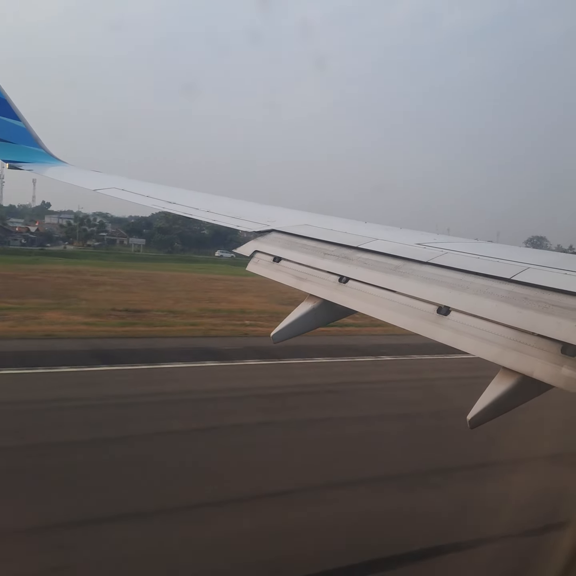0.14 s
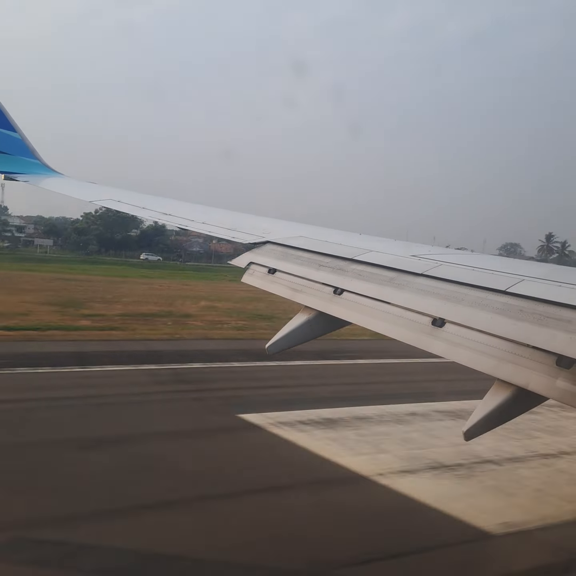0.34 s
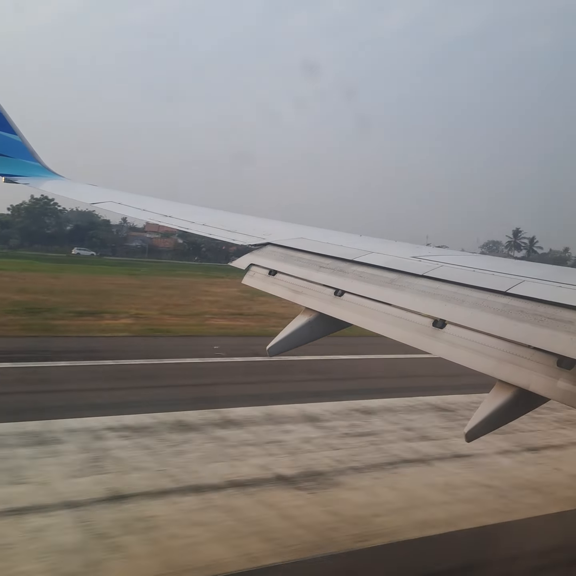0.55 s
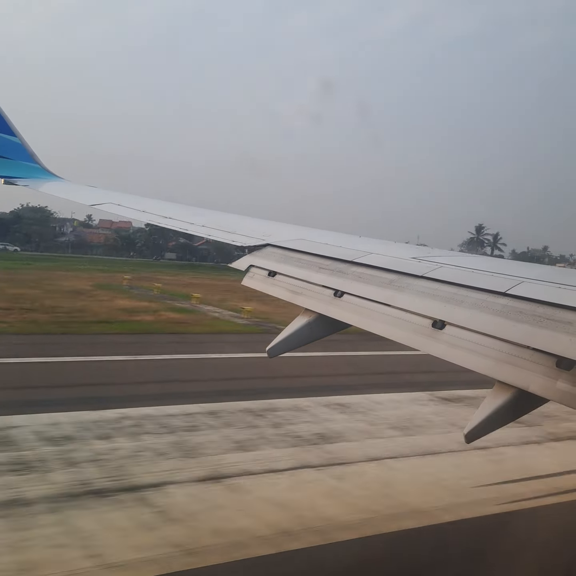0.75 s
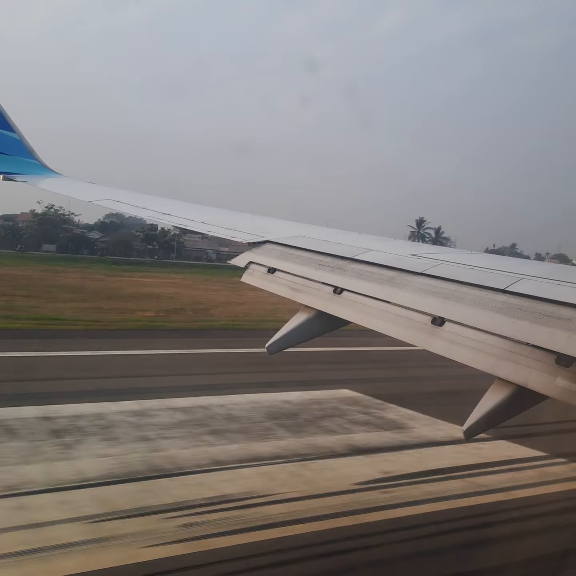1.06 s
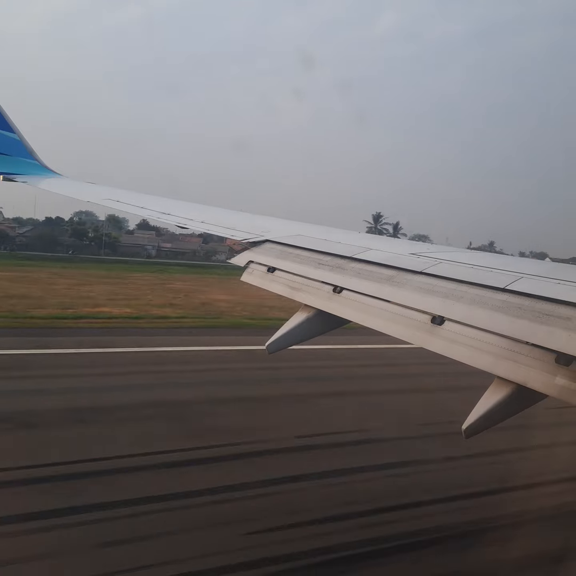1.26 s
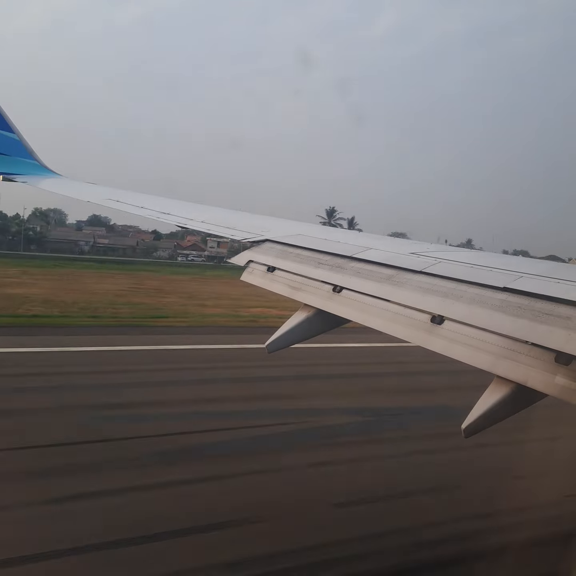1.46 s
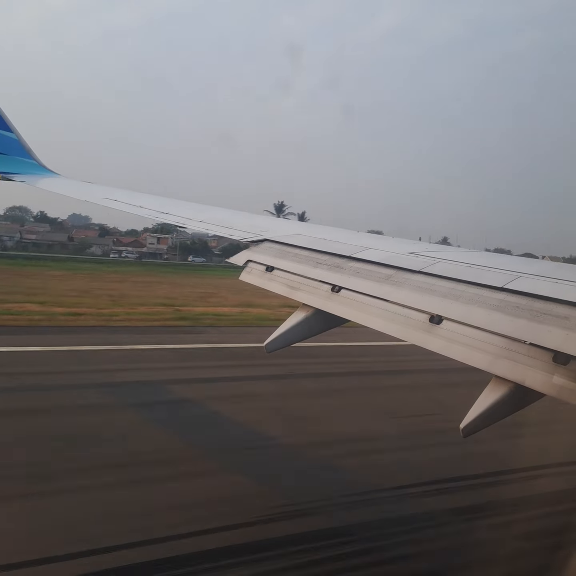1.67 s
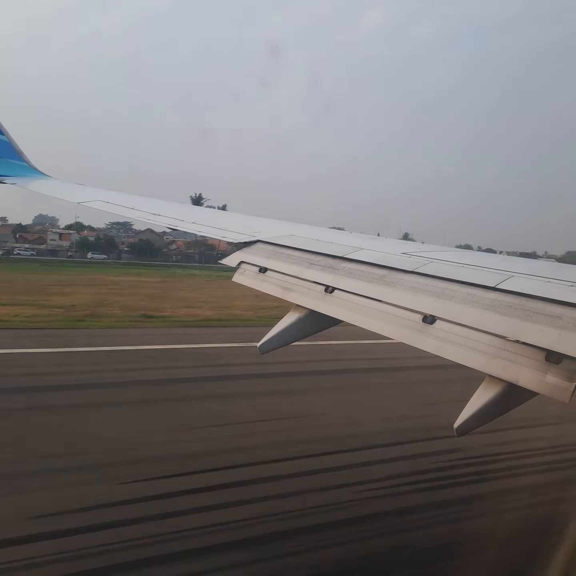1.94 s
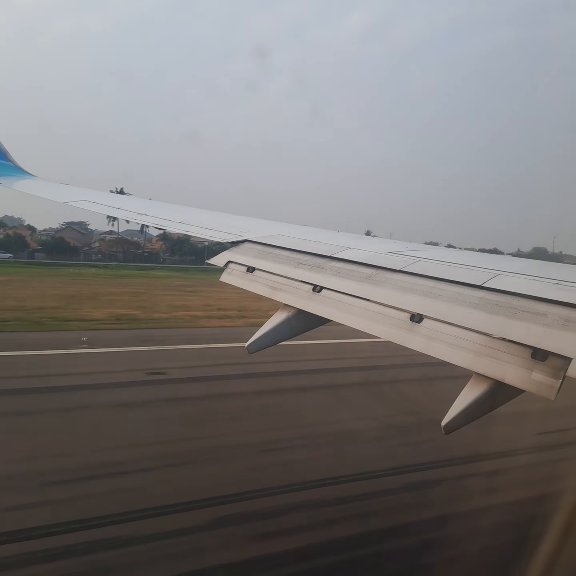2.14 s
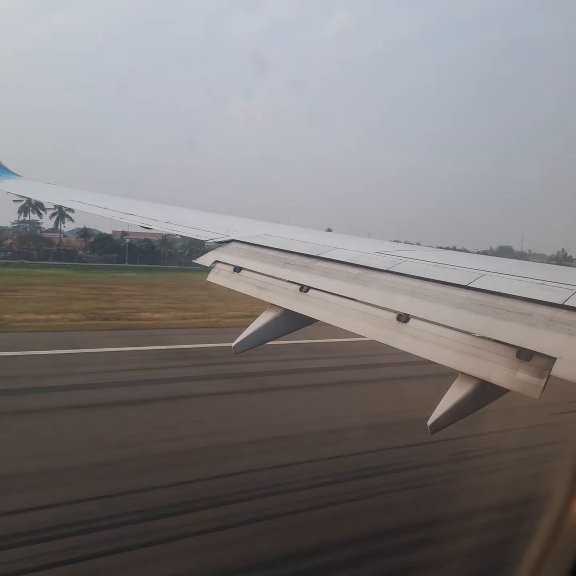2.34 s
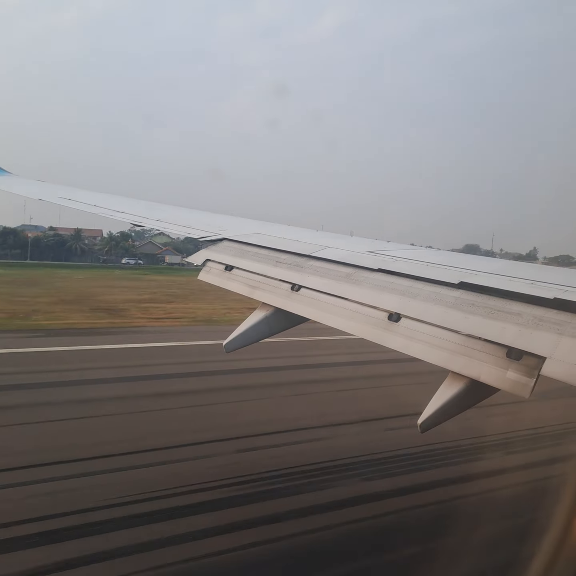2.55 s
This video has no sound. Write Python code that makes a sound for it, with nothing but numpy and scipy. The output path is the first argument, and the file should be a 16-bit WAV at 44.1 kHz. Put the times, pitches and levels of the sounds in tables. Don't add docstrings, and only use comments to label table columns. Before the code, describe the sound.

An airliner rolls fast along a runway, heard from inside the cabin on a phone at the window: deep uneven rumble, muffled jet roar, faint fan whine, steady airy hiss, and small trim ticks and panel knocks.

```python
import sys
import numpy as np
from scipy import signal
from scipy.fft import rfft, irfft
from scipy.io import wavfile
from scipy.ndimage import uniform_filter1d

SR = 44100
rng = np.random.default_rng(int(sys.argv[2]) if len(sys.argv) > 2 else 0)


def magnitude_from_level(level_db):
    exponent = np.asarray(level_db, float) / 20
    return 10 ** exponent


def wav_out(sig):
    wavfile.write(sys.argv[1], SR, np.round(np.clip(np.atleast_2d(sig).T, -1, 1) * 32767).astype(np.int16))


N = 119070
T = np.arange(N) / SR
F = np.fft.rfftfreq(N, 1 / SR) + 1e-3
PORT_LAG_S = 21 / 44100

# (frequency [Hz], share [0-1])
PORT_LIKENESS = [(40, .995), (85, .968), (180, .955), (350, .68), (700, .45), (2500, .72), (5000, .42),
                 (12000, .36)]
# (frequency [Hz], level difference [dB])
PORT_LEAN = [(60, 0.5), (210, -0.5), (320, 4.5), (490, 0), (740, -1), (1130, -9), (1700, -4.5), (2200, 2.5),
             (4000, 0)]
# (frequency [Hz], density [dB per Hz])
VENT_HISS = [(4000, -7), (5000, -1.5), (7000, -10.5), (8300, -12), (12500, -8), (15800, -12.5)]
# (time [s], peak [dB], t60 [s], left over right [dB])
PANEL_KNOCKS = [
    (.179, -32, .05, 2),
    (1.418, -27, 0.015, 1),
    (1.492, -27, 0.099, -5.5),
    (1.9112, -25.5, 0.061, -16.5),
    (1.96, -31.5, 0.059, -11.5),
    (2.333, -27, .07, -8),
    (2.549, -27, .05, -8),
]
# (frequency [Hz], level [dB])
PANEL_MODES = [(600, -2), (860, 4.5), (1250, 0), (1560, -9), (2150, -10)]
# (time [s], peak [dB], centre [Hz], lower ring [dB], left over right [dB])
TRIM_TICKS = [(.041, -39, 4980, -5, -12.5), (.0445, -39, 10600, -7, -12), (.0874, -47, 7560, -5, 10.5),
              (.1064, -47.5, 7300, -16.5, -2), (.2122, -36, 6080, -6, -7.5),
              (0.2146, -42.5, 12000, -27, -9), (.2430, -42.5, 12470, -2.5, -12.5),
              (1.0652, -47, 6600, -13, 4.5), (1.2726, -55.5, 7240, -3, 5.5), (1.7828, -38.5, 7500, 5, -18),
              (1.7835, -50.5, 12940, -15.5, -15.5), (1.8470, -50, 11780, -20, -3),
              (1.9092, -32, 5800, 4.5, 9.5), (2.2214, -45, 7300, 0, 3), (2.2250, -55.5, 12760, -26, 3),
              (2.3451, -55, 6050, -3, 1.5), (2.3560, -48.5, 7280, 1.5, -2.5),
              (2.4010, -44, 12800, -17.5, -9), (2.4720, -34, 5000, 14, -3), (2.5052, -57, 14200, -24, -2),
              (2.5120, -43.5, 7680, -5, -6.5), (2.5501, -40, 10470, -16.5, -5),
              (2.5570, -40, 6700, -5.5, 1), (2.6356, -49.5, 9880, -26, 1)]
# (start [s], length [s], level [dB], centre [Hz])
CLOTH_RUSTLES = [
    (.2, .13, -72, 11000),
    (2.30, .1, -58, 3900),
    (2.44, .07, -61, 4200),
    (2.4, .19, -66, 9500),
    (2.31, .08, -65, 7000),
    (2.535, .045, -63, 6000),
    (2.49, .08, -69, 13500),
]
# (time [s], level [dB])
ENGINE_THRUST = [(0.05, -44.5), (1.83, -42), (2.4, -40.5), (2.7, -40.5)]
# (frequency [Hz], density [dB per Hz])
JET_ROAR = [(420, 4), (500, -6), (790, -10.5), (1280, -17.5), (1800, -20.5), (2600, -25), (2950, -30.5),
            (3600, -32.5), (5500, -40.5)]
# (frequency [Hz], width [Hz], level [dB])
FAN_WHINE = [(770, 80, -2.5), (2051, 140, -4.5), (2464, 40, -17.5), (3303, 130, -17), (3830, 140, -20),
             (7300, 800, -23.5), (15650, 130, -30.5)]
# (start [s], frequency [Hz], width [Hz], level [dB])
LATE_WHISTLE = (1.62, 12720, 170, -81)
# (time [s], level [dB])
WHEEL_SHAKE = [(0.0, -9), (0.04, -16), (0.08, -23.5), (0.15, -17.5), (0.22, -33.5), (0.28, -8), (0.59, -35),
               (0.6, -18), (1.47, -19), (1.48, -26), (1.68, -16.5), (1.77, -20), (1.82, -19.5),
               (2.04, -23.5), (2.29, -13.5), (2.35, -23), (2.66, -12.5), (2.7, -25)]
# (frequency [Hz], width [Hz], level [dB])
FUSELAGE_MODES = [(44.04, 20, -6.5), (50.67, 7.2, 2), (62.54, 9.7, -4), (100.6, 18, -6), (152.3, 35, -11.5),
                  (195.1, 22, -9.5), (244.8, 50.3, -18)]
# (frequency [Hz], density [dB per Hz])
CABIN_BOOM = [(15, -42), (25, -3.5), (54, 7.5), (107, -8), (124, -10), (200, -9), (406, -26.5),
              (494, -36.5), (700, -33.5), (910, -69.5), (1540, -120)]


def over_hz(table):
    a = np.array(table, float)
    return np.interp(np.log(F), np.log(a[:, 0]), a[:, 1])


def over_time(table):
    return np.interp(T, *np.array(table, float).T)


def unit(x):
    return x / np.sqrt(np.mean(x ** 2))


def ring(hz, width_hz):
    return 1 / (1 + 1j * (F / hz - hz / F) * hz / width_hz)


def slope(table, lo_hz, hi_hz):
    low_end = np.sqrt((1 + (lo_hz / F) ** 12) * (1 + (F / hi_hz) ** 8))
    return magnitude_from_level(over_hz(table)) / low_end


def band_pass(x, hz, width_hz):
    lo = max(hz - width_hz / 2, 100)
    hi = min(hz + width_hz / 2, .49 * SR)
    return unit(signal.sosfilt(signal.butter(2, [lo, hi], "band", fs=SR, output="sos"), x))


def ringing_noise(source, gain):
    return unit(irfft(rfft(source) * gain, N))


def walk(rate_hz):
    step = 32
    f = F[:N // step // 2 + 1]
    drift = rfft(rng.standard_normal(N // step)) / (1 + (f / rate_hz) ** 2)
    slow = irfft(drift * (f > .1), N // step)
    return np.interp(T, T[::step][:len(slow)], unit(slow))


def field(gain, lag_s, swell_db, flicker_db, rate_hz):
    likeness = np.clip(over_hz(PORT_LIKENESS), 0, 1)
    mid, side = rfft(rng.standard_normal((2, N)))
    mid = np.sqrt(1 + likeness) * mid
    side = np.sqrt(1 - likeness) * side
    lean = magnitude_from_level(over_hz(PORT_LEAN) / 2)
    left = (mid + side) * lean
    right = (mid - side) / lean * np.exp(-2j * np.pi * F * lag_s)
    pair = np.array([left, right]) * gain
    out, swell = 0, walk(rate_hz / 4)
    for k in np.arange(8, 29):
        half_octave = np.cos(np.pi / 2 * np.clip(2 * np.log2(F) - k, -1, 1)) ** 2
        if np.any(np.abs(gain * half_octave) > 1e-3 * np.abs(gain).max()):
            motion = magnitude_from_level(swell_db * swell + flicker_db * walk(rate_hz))
            out = out + irfft(pair * half_octave, N) * motion
    return unit(out)


def place(out, start_s, x, peak_db, pan_db, lag_s):
    for ch, (lag, side_db) in enumerate([(0, pan_db / 2), (lag_s, -pan_db / 2)]):
        i = int((start_s + lag) * SR)
        x = x[:N - i]
        out[ch, i:i + len(x)] += x * magnitude_from_level(peak_db + side_db) / np.abs(x).max()


def fade(t, t60_s):
    return np.exp(-np.log(1000) * t / t60_s)


def air_vents():
    return field(slope(VENT_HISS, 4200, 17000), 0, 0.57, .6, 15) * magnitude_from_level(-67)


def cloth_rustles():
    out = np.zeros((2, N))
    for start_s, length_s, db, hz in CLOTH_RUSTLES:
        grain = rng.standard_normal((2, N)) * magnitude_from_level(4.5 * walk(140))
        swell = np.sin(np.pi * np.clip((T - start_s) / length_s, 0, 1))
        out = out + magnitude_from_level(db) * swell * ringing_noise(grain, ring(hz, .9 * hz) ** 2)
    return out


def trim_ticks():
    out, t = np.zeros((2, N)), T[:SR // 5]
    for start_s, peak_db, hz, low_db, pan_db in TRIM_TICKS:
        crack = rng.standard_normal(len(t))
        bright = band_pass(crack, hz, .65 * hz) * fade(t, .012)
        low = band_pass(crack, 3200, 1400) * fade(t, .022)
        x = (bright + magnitude_from_level(low_db) * low) * np.minimum(t / 0.00068, 1)
        place(out, start_s, x, peak_db, pan_db, PORT_LAG_S)
    return out


def panel_knocks():
    out, t = np.zeros((2, N)), T[:SR // 5]
    rattle_hz, rattle_db, tail_db = 1150, 3, -10
    for start_s, peak_db, t60_s, pan_db in PANEL_KNOCKS:
        x = 0
        for hz, mode_db in PANEL_MODES:
            level_chance, pitch_chance = rng.standard_normal(2)
            tone = np.sin(2 * np.pi * hz * (1 + 0.03 * pitch_chance) * t)
            x = x + magnitude_from_level(mode_db + 3.1 * level_chance) * tone * fade(t, t60_s * (900 / hz) ** 0.9)
        rattle = band_pass(rng.standard_normal(len(t)), rattle_hz, 1500)
        rattle = band_pass(rattle, rattle_hz, 1700)
        decay = fade(t, t60_s) + magnitude_from_level(tail_db) * fade(t, 4 * t60_s)
        x = x + magnitude_from_level(rattle_db) * rattle * decay
        place(out, start_s, x * np.minimum(t / .0016, 1), peak_db, pan_db, PORT_LAG_S / 2)
    return out


def engines():
    thrust = over_time(ENGINE_THRUST)
    roar = field(slope(JET_ROAR, 546, 5600), PORT_LAG_S, 0.27, 1.0, 7.2) * magnitude_from_level(thrust + 1.54)
    whine_gain = sum(magnitude_from_level(db) * np.abs(ring(hz, w)) ** 2 / np.sqrt(w) for hz, w, db in FAN_WHINE)
    whine_db = -48 + .3 * (thrust - thrust.mean())
    whine = field(whine_gain, PORT_LAG_S, .6, .6, 8) * magnitude_from_level(whine_db)
    start_s, hz, width_hz, db = LATE_WHISTLE
    whistle = ringing_noise(rng.standard_normal((2, N)), ring(hz, width_hz) ** 2)
    whistle = whistle * magnitude_from_level(db) * np.clip((T - start_s) / .1, 0, 1)
    return roar + whine + whistle


def rumble():
    shake = over_time(WHEEL_SHAKE)
    shake = shake - shake.mean()
    soft_shake = 0.17 * shake
    low_gain = sum(magnitude_from_level(db) * ring(hz, w) ** 2 for hz, w, db in FUSELAGE_MODES if hz < 80)
    high_gain = sum(magnitude_from_level(db) * ring(hz, w) ** 2 for hz, w, db in FUSELAGE_MODES if hz >= 80)
    low = field(low_gain, 0, .2, .2, 4.7)
    power = uniform_filter1d((low ** 2).mean(0), size=2500)
    power = uniform_filter1d(power, size=2500)
    steadiness = .75
    low = low / (power + 0.035) ** (steadiness / 2) * magnitude_from_level(-17 + shake)
    high = field(high_gain, 0, .2, 0.2, 4.6) * magnitude_from_level(-22.5 + soft_shake)
    boom = field(slope(CABIN_BOOM, 72.5, 560), 0, 0.17, 0.58, 23) * magnitude_from_level(-20 + soft_shake)
    return low + high + boom


def scene():
    trim = cloth_rustles() + trim_ticks() + panel_knocks()
    return air_vents() + trim + engines() + rumble()


def band_limit(x):
    return signal.sosfilt(signal.butter(12, 15830, fs=SR, output="sos"), x)


def record(dry):
    heard = irfft(rfft(dry) / np.sqrt(1 + (38 / F) ** 10), N)
    push = uniform_filter1d(np.abs(heard).mean(0), size=900)
    opening, opening_s = .6, .006
    opened = 1 - (1 - opening) * np.exp(-T / opening_s)
    gain = magnitude_from_level(2.0) * opened / (1 + push)
    return band_limit(heard * gain)


dry = scene()
out = record(dry)
wav_out(out)
```